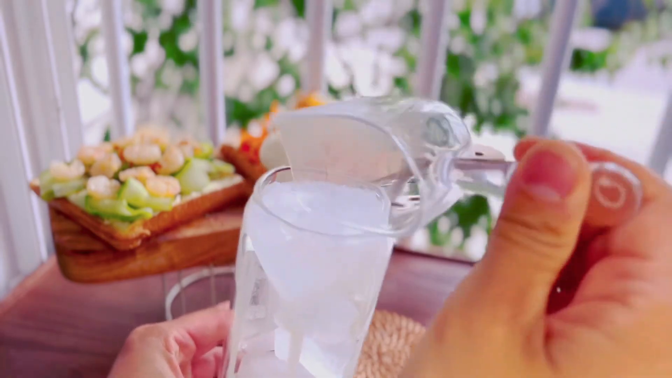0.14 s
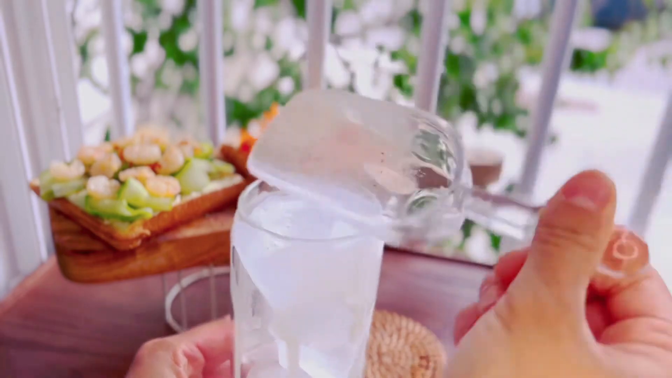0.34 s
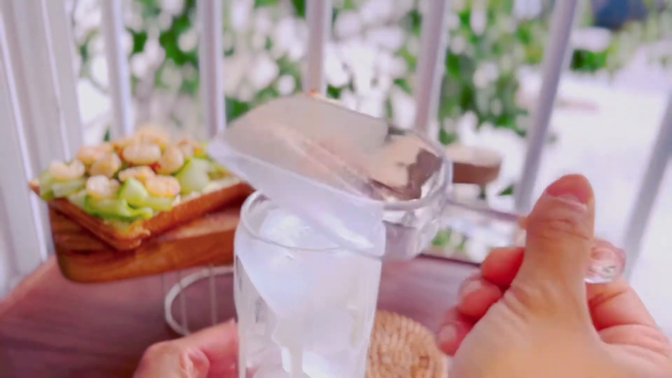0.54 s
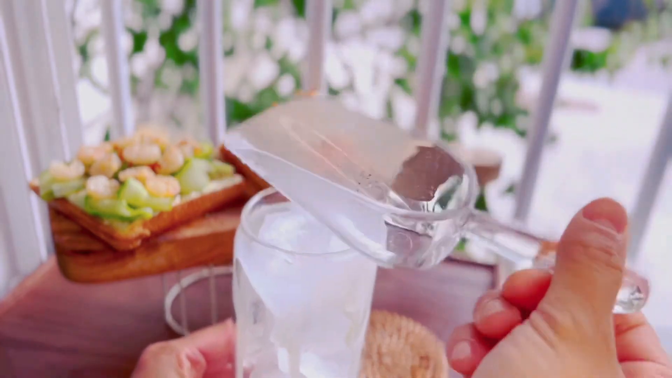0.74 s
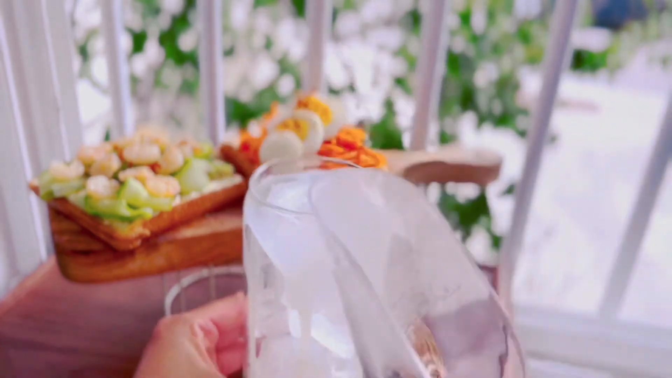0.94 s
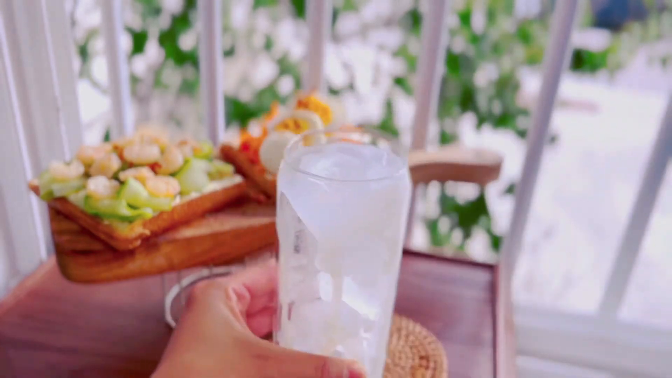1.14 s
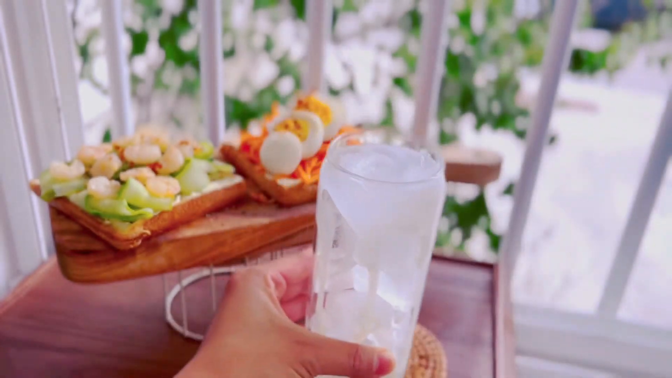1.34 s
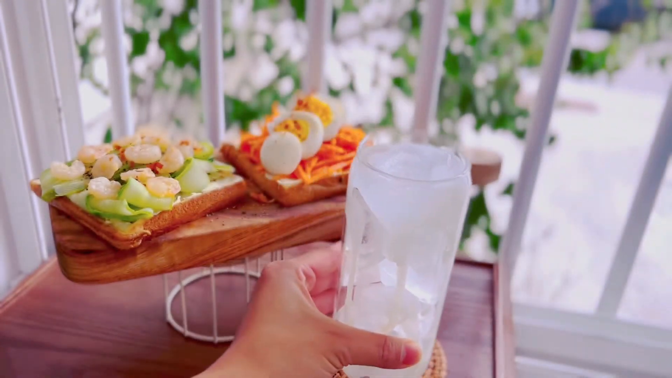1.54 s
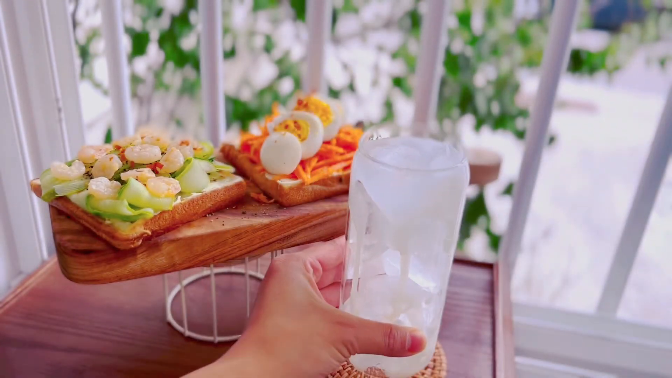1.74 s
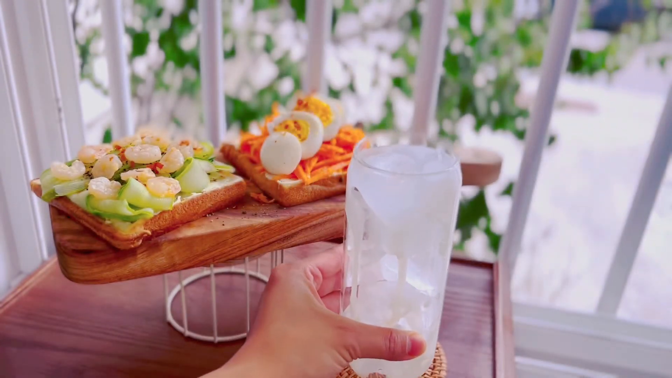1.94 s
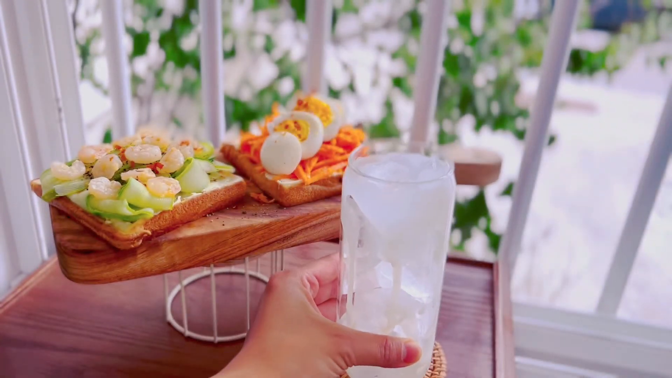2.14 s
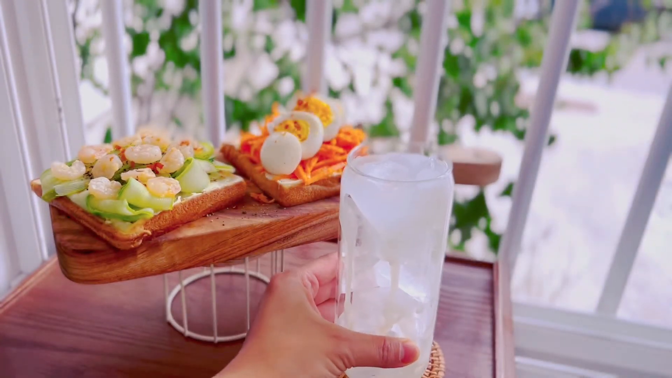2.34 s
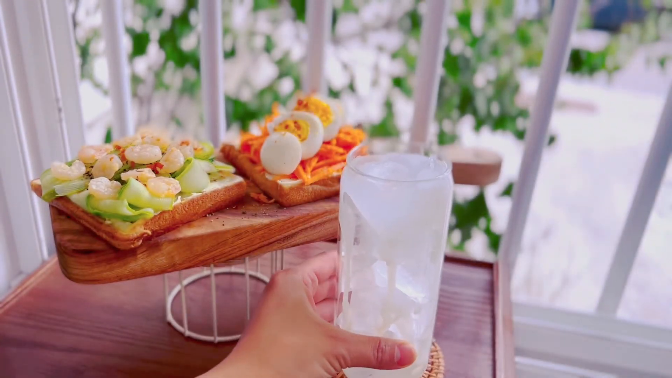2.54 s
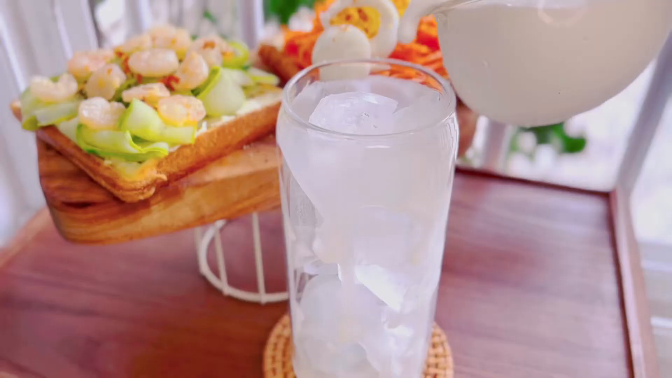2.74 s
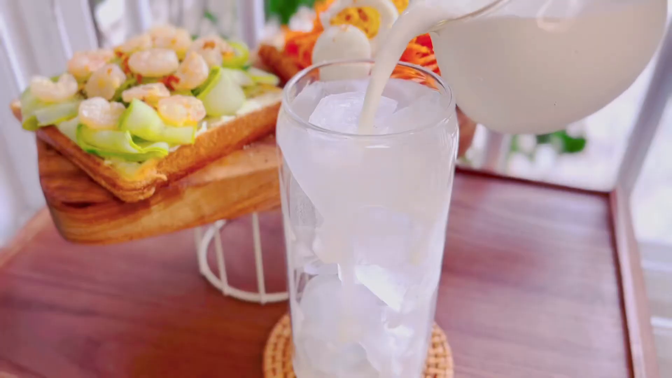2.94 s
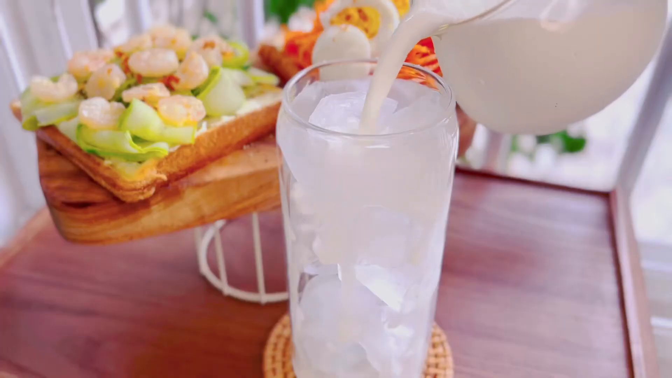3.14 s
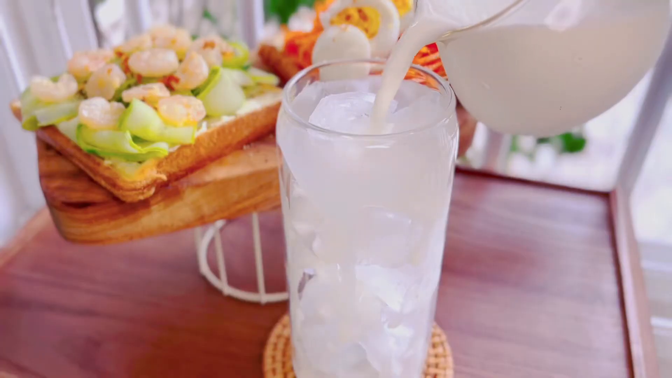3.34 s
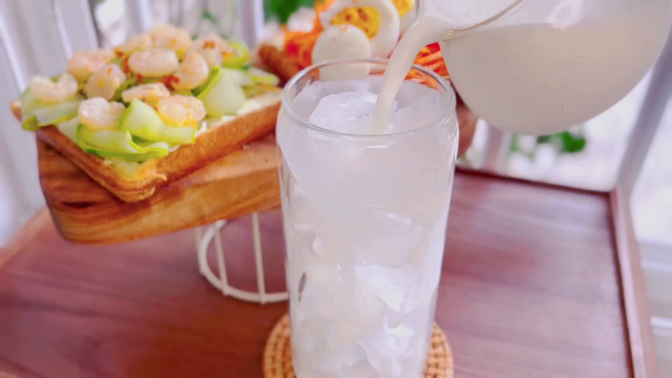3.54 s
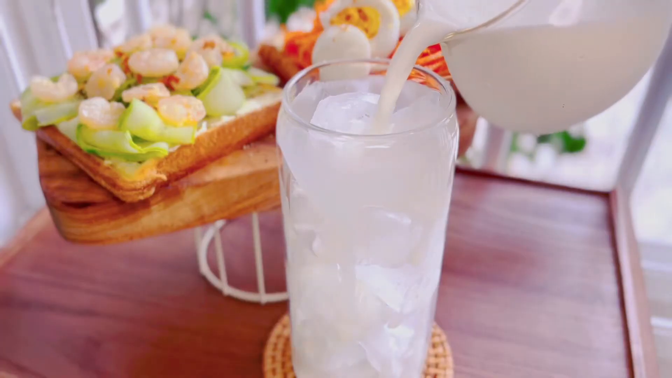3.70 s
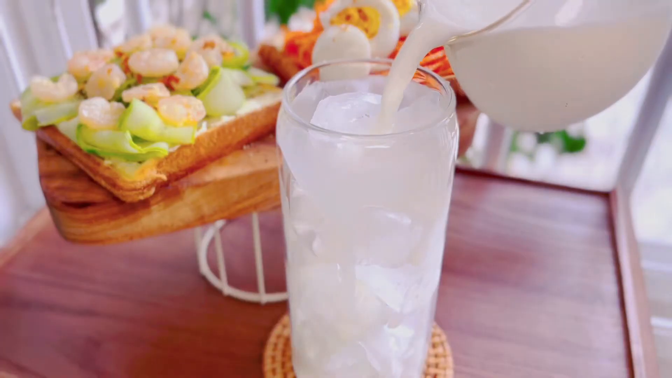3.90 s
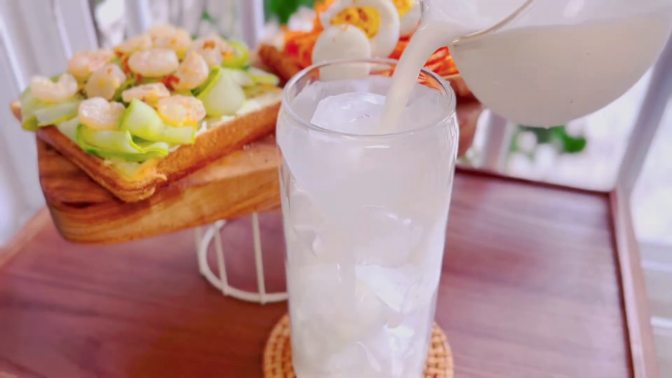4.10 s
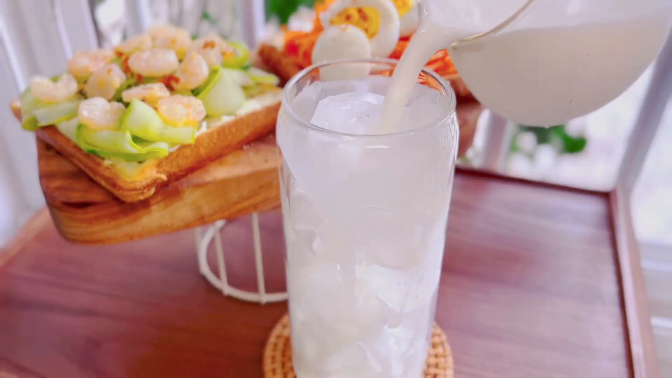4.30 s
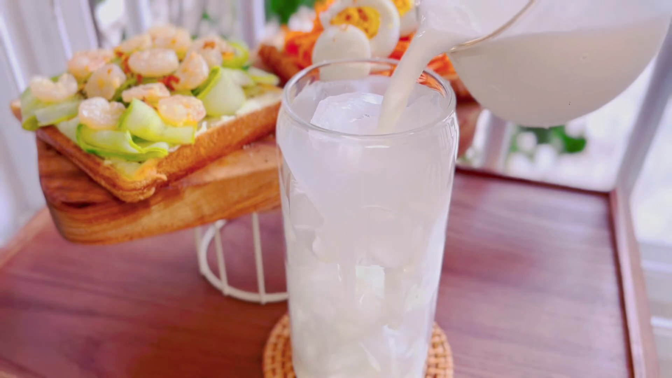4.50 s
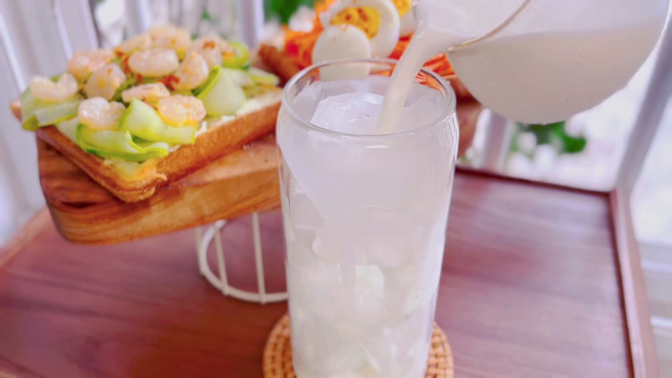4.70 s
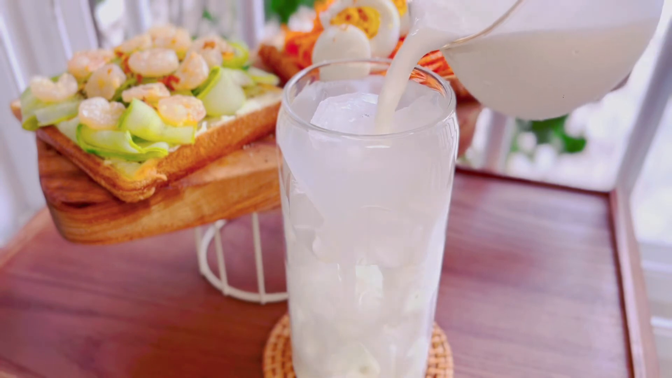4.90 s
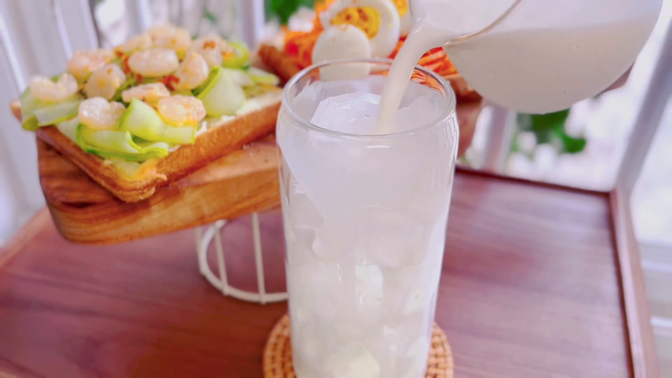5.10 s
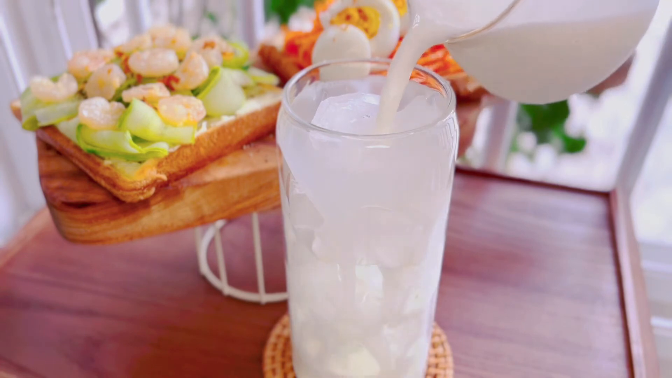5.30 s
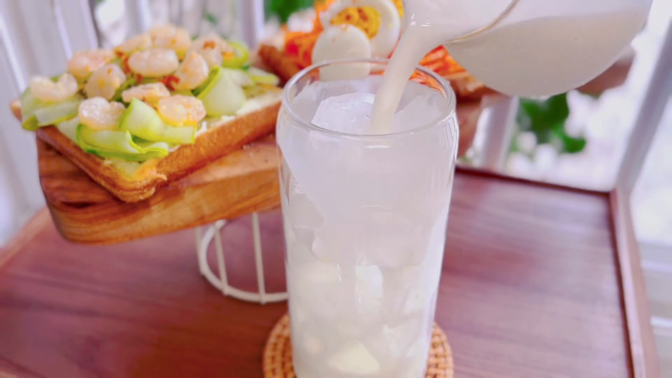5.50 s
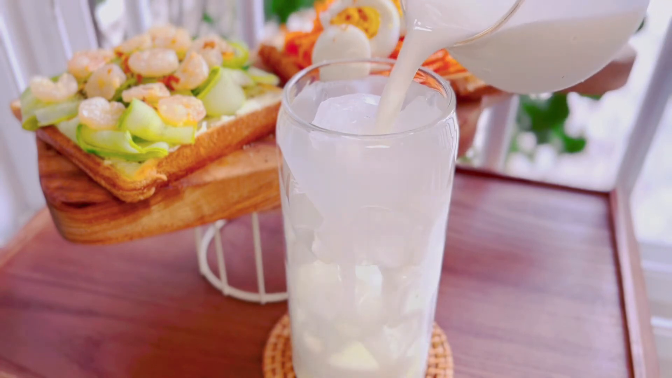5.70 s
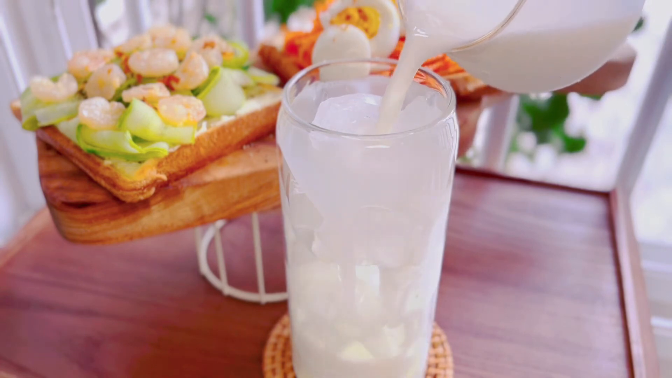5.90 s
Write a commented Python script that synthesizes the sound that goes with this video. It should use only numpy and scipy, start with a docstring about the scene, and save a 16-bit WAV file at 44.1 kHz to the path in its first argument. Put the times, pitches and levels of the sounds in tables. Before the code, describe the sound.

Ice knocks and clatters sharply in a tall glass, pauses, fades out briefly, then cubes tick and crack faintly as milk goes in.

```python
"""A tall glass full of ice is struck by a plastic scoop; after a fade and a cut, milk is poured in and cubes crack.
Each blow sums shaped noise, damped modes of the glass, a dull knock and the resonance of the enclosed air.
Ice chips hiss, tiny ticks fizz in the milk, and sparse reflections form the room's echo.
Street noise through an open window is random short-time spectra; a far tone and a machine hum are sines.
Left and right differ in phase and level by frequency, and the far sound also in likeness."""
import sys
import numpy as np
from scipy import signal
from scipy.fft import rfft, irfft
from scipy.io import wavfile
from scipy.ndimage import uniform_filter1d

SR = 44100
rng = np.random.default_rng(int(sys.argv[2]) if len(sys.argv) > 2 else 0)


def to_wav(s):
    """Save 16-bit WAV."""
    ch = np.atleast_2d(s).T  # columns
    pcm = np.round(np.clip(ch, -1, 1) * 32767)  # PCM
    wavfile.write(sys.argv[1], SR, pcm.astype(np.int16))


N = 262395  # length in samples

# Air outside before and after the cut, relative spectral density: [f/Hz, level/dB per Hz]
STREET_BEFORE = [(22, -26.5), (45, -0.5), (70, 0), (110, -12), (240, -14.5), (430, -22), (670, -17.5),
                 (850, -21), (1040, -18), (1450, -25), (1800, -24.5), (2300, -32), (3500, -37.5),
                 (4000, -43), (6500, -42.5), (11000, -53.5), (16000, -78)]
STREET_AFTER = [(22, -28.5), (45, 8), (65, 5), (110, -10), (170, -16), (240, -15), (400, -20.5),
                (1000, -21.5), (2000, -32), (3050, -42.5), (3300, -41), (3600, -47.5), (5000, -55.5),
                (7000, -62.5), (12000, -69.5), (16000, -79)]
# Street above the bass, level referred to its 150-3000 Hz rms: [t/s, level/dB]
HISS_LEVEL = [(0.0, -38), (0.57, -38.5), (0.81, -40), (2.22, -42), (2.6, -44), (2.9, -46), (3.32, -47),
              (5.18, -45.5), (5.95, -45)]
# Street bass, same reference: [t/s, level/dB]
BASS_LEVEL = [(0, -41), (1, -43.5), (2.6, -41.5), (2.9, -48.5), (5.95, -50.5)]
# Change of the street's treble, swelling about twice a second after the cut: [t/s, level/dB]
TREBLE_SWELL = [(.9, -7), (1.4, -9.5), (2.7, -11), (2.88, 5.5), (3.049, -9), (3.28, 4.5), (3.54, -7.5),
                (3.72, 9), (3.87, -7.5), (4.14, -6), (4.28, 7), (4.47, -1.5), (4.72, -6.5), (4.88, 7),
                (5.07, 0), (5.29, 4.5), (5.45, 0.5), (5.74, 7), (5.95, -0.5)]
# Machine hum, and a faint far tone that swells twice; rms before the side gains: [t/s, f/Hz, level/dB]
HUM = [(2.75, 81.1, -46), (2.9, 80, -43), (5.6, 79.5, -40), (5.72, 82, -38), (6, 81.4, -35.5)]
FAR_TONE = [(1.0, 359, -65), (1.22, 353, -47.5), (1.45, 350.6, -68), (1.69, 354, -51), (2.0, 340, -89)]
# Left-right likeness, phase lead and level difference of the far sound:
# [f/Hz, likeness, right lead/rad, left minus right level/dB]
FAR_STEREO = [(70, 0.99, .01, 1.5), (197, 0.98, 0.11, 2.5), (442, 0.33, 1, 2), (1220, 0.51, 2.6, -0.5),
              (2240, .5, 6.34, 4), (4400, 0.39, 5.3, 1.5), (6500, 0.14, 8.25, 4.5),
              (7800, .999, 9.42, -3.5), (9020, 0.99, 9.45, 2), (11500, 0.55, 12.6, 0),
              (13860, .5, 12, -2.5)]
# Left-right phase lead and level difference of the glass: [f/Hz, right lead/rad, left minus right level/dB]
NEAR_STEREO = [(100, 0.1, 3), (440, 0.53, 2), (1200, 0.92, 1), (2002, 0.5, 0.5), (4000, -2.5, 6.5),
               (5200, 1.32, 3.5), (6300, 1.4, 7.5), (8570, 2.5, -1.5), (10300, 7.5, -1), (12000, 6.5, 5),
               (14000, 8, -2), (15550, 10.5, 0)]
# Reverberation of the room: [f/Hz, t60/s]
ROOM_DECAY = [(2000, 0.2), (6000, 0.24), (14000, 0.096)]
# Ice chips shaken loose by the hard knocks, level before the band-pass: [t/s, level/dB, t60/s]
CHIP_SPRAYS = [(.155, -52.5, .15), (.42, -51.5, 0.28), (.63, -40, .25)]
# Ice-damped modes of the glass, dry and then filling, relative level: [f/Hz, level/dB, t60/s]
DRY_MODES = [(1120, -1, 0.035), (1420, -2, 0.033), (1840, -2, .04), (2030, -1, 0.033), (2610, 0, 0.018),
             (3020, -5, .02), (3470, -8.5, 0.027), (3920, -0.5, .035), (4200, -5, 0.023),
             (4654, -7.5, 0.028), (5750, -0.5, 0.025), (6903, -6.5, 0.019), (10740, -6.5, .025),
             (11450, -8.5, .018)]
WET_MODES = [(1360, 8, 0.051), (1710, 3.5, 0.042), (2070, -0.5, 0.042), (2740, 0.5, .025),
             (3280, -1.5, 0.043), (3652, 4, 0.021), (3950, 1, 0.021), (4400, -9, 0.025), (5170, -11, 0.03),
             (5910, -9, 0.02), (6500, -17, 0.022), (10300, -20, .03), (12000, -1, .02)]
# Blows on the glass, their ringing and quick returns, and the glass being set down, peak levels:
# [t/s, crack f/Hz, level/dB, clatter f/Hz, level/dB, second clatter f/Hz, level/dB,
# knock f/Hz, level/dB, air f/Hz, level/dB]
DRY_BLOWS = [(0.0044, 9000, -46, 3370, -39, 5750, -51.5, 1060, -54, 420, -35.5),
             (0.021, 9160, -43.5, 3342, -30, 5020, -48, 1120, -28, 450, -55.5),
             (0.0317, 9000, -45, 4150, -47, 5750, -59.5, 1250, -51, 430, -68.5),
             (0.043, 9000, -48, 3470, -38.5, 5750, -58, 1180, -56.5, 442, -64.5),
             (0.1132, 10300, -14, 5720, -13.5, 2610, -15.5, 1120, -23.5, 463, -35),
             (0.151, 10300, -13.5, 5820, -20.5, 3470, -21.5, 2030, -22.5, 438, -27),
             (0.1165, 10000, -45, 2030, -27.5, 5750, -31, 1420, -35, 440.7, -23.5),
             (0.156, 9960, -40, 2030, -25.5, 3470, -32.5, 1120, -32.5, 440, -32),
             (0.164, 12000, -30, 3430, -21.5, 5724, -28.5, 1115, -30, 443, -44.5),
             (0.1673, 9960, -39.5, 5820, -27, 2404, -25.5, 1910, -19.5, 440, -58),
             (0.177, 10030, -47.5, 4000, -44, 2610, -38, 1200, -41, 440, -59),
             (0.197, 11000, -38, 5120, -54.5, 3380, -57, 1780, -62.5, 445.5, -62.5),
             (0.413, 10960, -8, 6900, -8.5, 4200, -11.5, 1900, -4, 440, -12),
             (0.417, 10500, -31, 5000, -25.5, 1420, -16.5, 1880, -22.5, 440, -60),
             (0.4262, 10000, -47, 3960, -28.5, 2273, -32.5, 1900, -25.5, 440, -64.5),
             (0.6246, 11500, -14.5, 3920, -19.5, 6300, -17, 1900, -5, 454, -21),
             (0.638, 10020, -37.5, 4100, -24.5, 2255, -33.5, 1810, -17.5, 438, -22.5),
             (0.645, 10000, -47, 3510, -24.5, 2100, -29, 1200, -33, 440, -62),
             (0.65, 10000, -44, 4200, -26, 2090, -41, 1290, -38.5, 440, -63),
             (0.7926, 10100, -45.5, 3630, -46, 5050, -53, 1030, -41, 440, -59.5),
             (2.128, 13000, -40.5, 3830, -47, 910, -47.5, 600, -30, 390, -36.5),
             (2.161, 12000, -50.5, 3340, -45, 890, -50, 740, -33, 405, -37.5)]
# Cubes cracking and shifting in the milk, peak levels: [t/s, crack f/Hz, level/dB, clatter f/Hz, level/dB,
# second clatter f/Hz, level/dB, knock f/Hz, level/dB]
MILK_CRACKS = [(2.95, 12000, -62.5, 8460, -76, 4480, -77, 1800, -75),
               (3.171, 9970, -75, 7800, -62, 4500, -73, 1756, -69),
               (3.686, 10400, -58, 4766, -47.5, 2500, -42, 1780, -41),
               (3.991, 9880, -61, 5500, -60, 4400, -49, 3536, -46),
               (4.031, 10130, -68, 8000, -66, 4530, -73, 1843, -69),
               (4.262, 10000, -64, 6500, -51, 4983, -56, 3950, -45),
               (4.282, 11000, -56, 8000, -64, 4500, -67.5, 2062, -63),
               (4.317, 11000, -64, 4700, -52, 3300, -62, 1390, -41),
               (4.3256, 11500, -38, 5980, -21, 3420, -20.5, 1710, -34),
               (4.33, 10500, -50, 6040, -37, 4500, -38, 3370, -28),
               (4.3348, 10300, -52, 6200, -49, 3280, -40, 1710, -55),
               (4.356, 13300, -62, 6500, -70, 4500, -70, 1710, -71),
               (4.372, 13000, -58, 6500, -70, 4500, -68, 1710, -71),
               (4.363, 14300, -44, 6500, -57, 4510, -71, 1710, -71),
               (4.9484, 9950, -45.5, 5140, -31.5, 3400, -26.5, 2070, -36.5),
               (4.9518, 10000, -54.5, 6500, -39.5, 3900, -37.5, 1310, -37.5),
               (4.959, 10500, -60, 6600, -53, 3280, -54, 2070, -57),
               (5.2352, 10030, -76, 4400, -59.5, 3020, -52, 1331, -35),
               (5.238, 10000, -75, 2740, -33.5, 3460, -54, 2070, -37.5),
               (5.249, 10000, -73, 3950, -54.5, 5500, -67, 2070, -58),
               (5.316, 11000, -59.5, 5550, -66, 4480, -68, 1851, -65),
               (5.656, 11000, -49, 5530, -48, 2070, -33.5, 2100, -39),
               (5.725, 10000, -68, 6980, -56, 4500, -70.5, 1757, -60),
               (5.83, 11100, -61, 7940, -62, 4540, -69, 1681, -64)]

FADE_OUT, FADE_IN = (2.6, 2.735, 1.25), (2.745, 2.9, 1.6)  # (start/s, end/s, curve power)
EDGE_HZ = 16300  # upper band limit
ROOM_LAG_S = 0.0098  # first return from the walls
AIR_LAG_S, AIR_T60_S = 0.002, 0.11  # the air in the glass answers late
AIR_HOLD = 1.2  # over 1: the swing holds before it dies
THUMP_DB = -9.5  # thump peak relative to the air swing
MILK_AIR_HZ, MILK_AIR_DB = 438, -15  # air swing in the milk, peak relative to the knock
KNOCK_LAG_S = .0006  # the knock follows the crack
DRY_KNOCK_S, WET_KNOCK_S = .00032, .0005  # time constant of the knock: milk makes it rounder
WASH_DECAY_S, WASH_DB = .05, -19.5  # packed cubes jostling; peak before the clatter is scaled
DRY_RING_DB, WET_RING_DB = -3.5, -2  # peak of the modes before the clatter is scaled
CRACK_BAND, CLATTER_BAND, WASH_BAND = (.74, 1.24), (.89, 1.13), (.75, 1.3)  # edges as shares of the pitch


def amp(db):
    """Level in decibels as an amplitude ratio."""
    return 10 ** (np.asarray(db) / 20)


def evened(x):
    """Normalisation to unit rms."""
    return x / np.sqrt(np.mean(x ** 2) + 1e-20)


def peaked(x, db):
    """Normalisation to a peak level."""
    return amp(db) * x / abs(x).max()


def read(points, hz):
    """Interpolation of a table's columns on a logarithmic frequency axis."""
    f, *columns = np.transpose(points)
    return [np.interp(np.log(hz + 1), np.log(f + 1), c) for c in columns]


def curve(points, t):
    """Linear interpolation of a two-column table over time."""
    return np.interp(t, *np.transpose(points))


def band(x, lo_hz, hi_hz):
    """Causal Butterworth band-pass."""
    return signal.sosfilt(signal.butter(2, [lo_hz, hi_hz], "band", fs=SR, output="sos"), x)


def add(mix, s, sound):
    """Superposition of a sound starting at s seconds."""
    part = mix[round(s * SR):][:len(sound)]
    part += sound[:len(part)]


def tone(rows):
    """Phase as the integral of frequency: a sine on a pitch and level curve, near silent outside it."""
    s, hz, db = np.transpose(rows)
    t = np.arange(N) / SR
    level = np.sqrt(2) * amp(np.interp(t, s, db, -120, -120))
    return level * np.sin(2 * np.pi * np.cumsum(np.interp(t, s, hz)) / SR)


def street(spectrum):
    """Partial coherence: random spectra with drifting patches and lumpy bass, shared in part by left and right."""
    frames, hz = N // 256 + 5, np.fft.rfftfreq(1024, 1 / SR)
    a, b, c, d, patches = rng.standard_normal((frames, 513, 5)).T
    patches = uniform_filter1d(patches, size=10, axis=0)
    patches = evened(uniform_filter1d(patches, size=14, axis=1))
    lumps = evened(uniform_filter1d(rng.standard_normal(frames), size=20))

    likeness, lead, lean_db = (v[:, None] for v in read(FAR_STEREO, hz))
    likeness = np.clip(likeness, 0, 1)
    left, other = a + 1j * b, c + 1j * d
    right = likeness * left * np.exp(1j * lead) + np.sqrt(1 - likeness ** 2) * other
    right = right / amp(lean_db)

    hz = hz[:, None]
    treble_db = np.clip((hz - 3500) / 3000, 0, 1) * curve(TREBLE_SWELL, np.arange(frames) * 256 / SR)
    field_db = 1.2 * patches + 0.8 * lumps * (hz < 130) + treble_db
    x = signal.istft(np.array([left, right]) * amp(field_db), nperseg=1024, noverlap=768)[1][:, :N]

    f = np.fft.rfftfreq(N, 1 / SR)
    coloured = rfft(x) * amp(read(spectrum, f)[0])  # at full length, to keep the bass peak sharp
    middle = irfft(coloured * (f > 150) * (f < 3000), N)
    return irfft(coloured, N) / np.sqrt(np.mean(middle ** 2))


def air():
    """Superposed ambience: street bass and hiss on separate level curves, with tones in phase, louder on the left."""
    t = np.arange(N) / SR
    outside = np.where(t < FADE_IN[0], street(STREET_BEFORE), street(STREET_AFTER))
    bass_share = 1 / (1 + (np.fft.rfftfreq(N, 1 / SR) / 130) ** 4)
    bass = irfft(rfft(outside) * bass_share, N)
    hiss = outside - bass
    tones = (tone(HUM) + tone(FAR_TONE)) * amp([[.7], [-.7]])  # left and right gains in decibels
    return amp(curve(HISS_LEVEL, t)) * hiss + amp(curve(BASS_LEVEL, t)) * bass + tones


def room(x):
    """Reverberation: sparse reflections of random sign decay by band; the echo is kept above the bass."""
    taps = np.zeros(SR // 2)
    at = np.arange(0, SR // 2 - 20, 20)
    at = at + rng.integers(0, 20, len(at))
    taps[at] = rng.choice([-1., 1.], len(at))
    hz, t, z = signal.stft(taps, SR, nperseg=256)
    decay = amp(-60 * t / read(ROOM_DECAY, hz)[0][:, None])
    tail = signal.istft(z * decay, SR, nperseg=256)[1]
    tail = band(tail, 650, 14000)
    tail = tail / np.linalg.norm(tail)
    late = np.pad(x, ((0, 0), (round(ROOM_LAG_S * SR), 0)))
    return signal.fftconvolve(late, tail[None], axes=1)[:, :N]


def fizz():
    """Random impulses exciting short damped sines: tiny ticks of ice straining once the milk flows."""
    ticks_per_s = 14
    size = amp(-76 + 2.1 * np.minimum(rng.exponential(1, N), 4)) * (rng.random(N) < ticks_per_s / SR)
    t = np.arange(800) / SR
    pick, out = rng.integers(0, 8, N), np.zeros(N)
    for k, hz in enumerate(np.geomspace(8500, 14000, num=8)):
        tick = (1 - np.exp(-t / .0006)) * amp(-60 * t / .012) * np.sin(2 * np.pi * hz * t)
        out += signal.oaconvolve(size * (pick == k), tick)[:N]
    return out * (np.arange(N) > FADE_IN[0] * SR)


def spray(db, t60):
    """Amplitude-modulated noise: ice chips skitter as ragged bright hiss that swells in and dies away."""
    t = np.arange(8000) / SR
    hiss, ragged = rng.standard_normal((2, len(t)))
    ragged = amp(3.0 * evened(uniform_filter1d(ragged, size=150)))
    envelope = (1 - np.exp(-t / .006)) * amp(-60 * t / t60)
    return amp(db) * band(hiss * ragged * envelope, 6000, 14000)


def air_column(db, hz, thump_db):
    """Damped resonance of the air in the glass, with a rough low thump."""
    t = np.arange(8000) / SR
    thump = rng.standard_normal(len(t)) * (1 - np.exp(-t / 0.0022)) * amp(-60 * t / .05)
    thump = band(thump, 450, 900)
    envelope = (1 - np.exp(-t / 0.00094)) * amp(-60 * (t / AIR_T60_S) ** AIR_HOLD)
    swing = envelope * np.sin(2 * np.pi * hz * t)
    return peaked(swing, db) + peaked(thump, thump_db)


def clatter(modes, ring_db, centre_hz, db, t):
    """Modal excitation: modes near one pitch ring with loose noise and a wide gritty wash."""
    rattle, grit = rng.standard_normal((2, len(t))) * (1 - np.exp(-t / 0.0004)) ** 2
    # each blow lands on another spot: chance level, pitch and phase per mode
    chance = rng.standard_normal((len(modes), 3))
    ring = np.zeros(len(t))
    for (hz, mode_db, t60), (u, v, w) in zip(modes, chance):
        level_db = mode_db + 1.5 * u - 18 * abs(np.log2(hz / centre_hz))  # 18 dB less per octave away
        ring += amp(level_db - 60 * t / t60) * np.sin(2 * np.pi * hz * (1 + 0.008 * v) * t + np.pi * w)
    ring = ring * (1 - np.exp(-t / 0.00037)) ** 2
    loose = band(rattle * amp(-60 * t / 0.013), centre_hz * CLATTER_BAND[0], centre_hz * CLATTER_BAND[1])
    wash = grit * t * amp(-60 * t / WASH_DECAY_S)
    wash = band(wash, centre_hz * WASH_BAND[0], centre_hz * WASH_BAND[1])
    return peaked(peaked(ring, ring_db) + peaked(loose, -2.5) + peaked(wash, WASH_DB), db)


def hit(modes, ring_db, knock_s, crack_hz, crack_db, clatter_hz, clatter_db, second_hz, second_db,
        knock_hz, knock_db):
    """Impact as broadband excitation: a noise crack, clatter at two pitches and a dull knock just after."""
    t = np.arange(4000) / SR
    burst, thud = rng.standard_normal((2, len(t))) * (1 - np.exp(-t / 0.00081)) ** 2
    two_stage_decay = amp(-60 * t / 0.0032) + amp(-32.5 - 60 * t / 0.027)
    crack = band(burst * two_stage_decay, crack_hz * CRACK_BAND[0], crack_hz * CRACK_BAND[1])
    pulse = t ** 4 * np.exp(-t / knock_s) * np.sin(2 * np.pi * knock_hz * t)
    dull = band(thud * amp(-60 * t / 0.014), knock_hz / 2.9, knock_hz * 0.85)
    knock = peaked(peaked(pulse, -1.8) + peaked(dull, -6.0), knock_db)
    rattle = clatter(modes, ring_db, clatter_hz, clatter_db, t)
    rattle = rattle + clatter(modes, ring_db, second_hz, second_db, t)
    return peaked(crack, crack_db) + rattle + np.roll(knock, round(KNOCK_LAG_S * SR))


def glass():
    """Superposed impacts on the glass, with a left-right phase and level difference."""
    x = fizz()
    milk_blows = [(*row, MILK_AIR_HZ, row[-1] + MILK_AIR_DB) for row in MILK_CRACKS]
    dry_body = (DRY_MODES, DRY_RING_DB, DRY_KNOCK_S)
    wet_body = (WET_MODES, WET_RING_DB, WET_KNOCK_S)
    for body, blows in ((dry_body, DRY_BLOWS), (wet_body, milk_blows)):
        for s, *row, air_hz, air_db in blows:
            add(x, s, hit(*body, *row))
            add(x, s + AIR_LAG_S, air_column(air_db, air_hz, air_db + THUMP_DB))
    for s, db, t60 in CHIP_SPRAYS:
        add(x, s, spray(db, t60))
    lead, lean_db = read(NEAR_STEREO, np.fft.rfftfreq(N, 1 / SR))
    right = irfft(rfft(x) * np.exp(1j * lead) / amp(lean_db), N)
    return np.array([x, right])


def scene():
    """Linear superposition of the glass, its room echo and the air."""
    near = glass()
    return near + amp(-19.5) * room(near) + air()


def record(dry):
    """Band limitation: a low cut, a fade down and up at the cut, a trace of hiss, then a treble limit."""
    t = np.arange(N) / SR
    (a, b, p), (c, d, q) = FADE_OUT, FADE_IN
    fade = np.clip((b - t) / (b - a), 0, 1) ** p + np.clip((t - c) / (d - c), 0, 1) ** q
    dry = signal.sosfilt(signal.butter(4, 36, "high", fs=SR, output="sos"), dry)  # wind filter
    faded = dry * fade + amp(-99.5) * rng.standard_normal(dry.shape)
    low_pass = signal.firwin(511, EDGE_HZ, window=("kaiser", 9), fs=SR)
    return signal.oaconvolve(faded, low_pass[None], "same")


dry = scene()
out = record(dry)
to_wav(out)
```